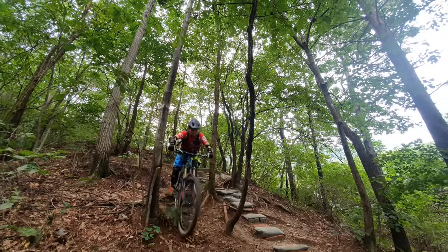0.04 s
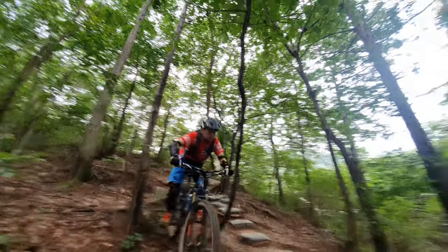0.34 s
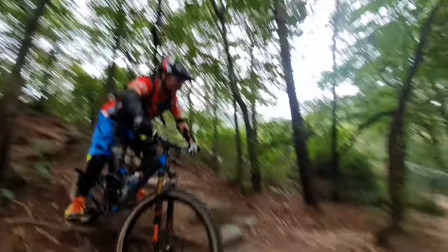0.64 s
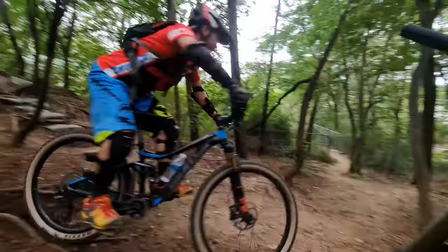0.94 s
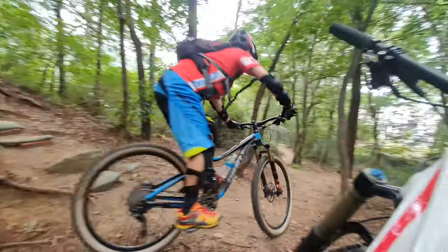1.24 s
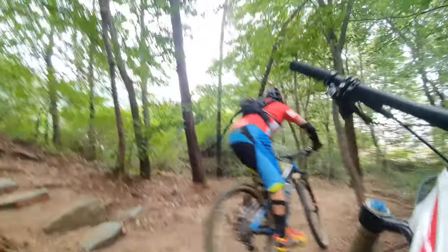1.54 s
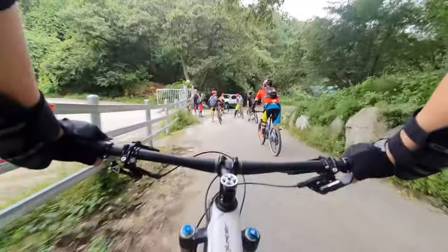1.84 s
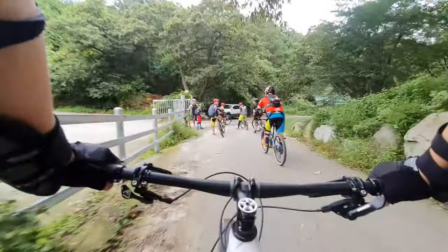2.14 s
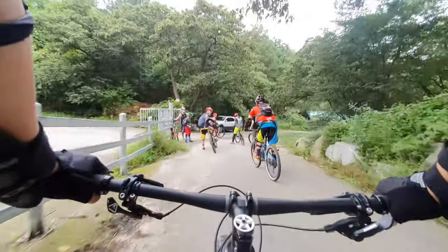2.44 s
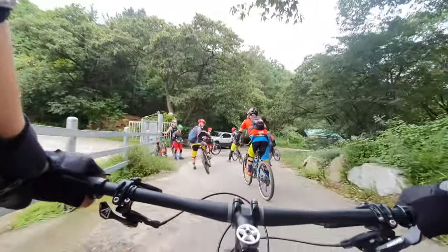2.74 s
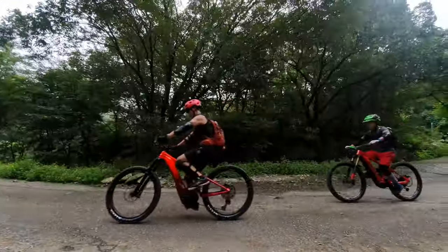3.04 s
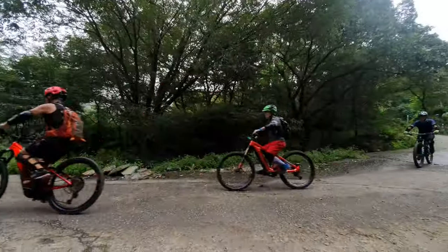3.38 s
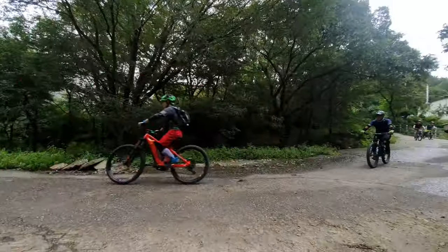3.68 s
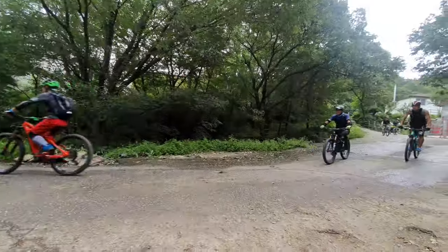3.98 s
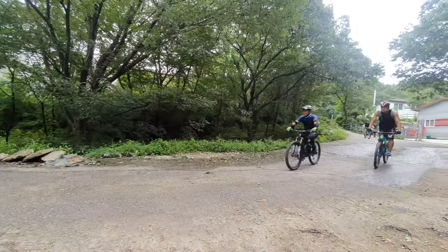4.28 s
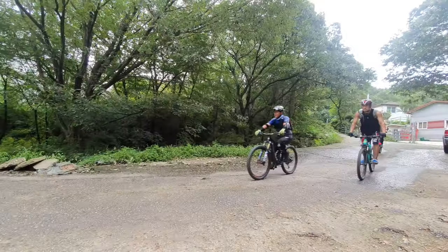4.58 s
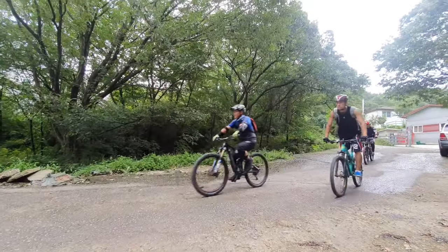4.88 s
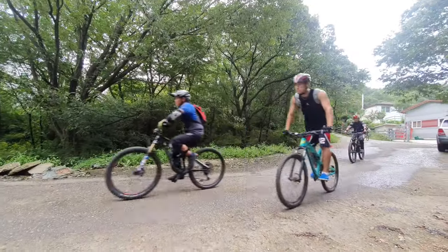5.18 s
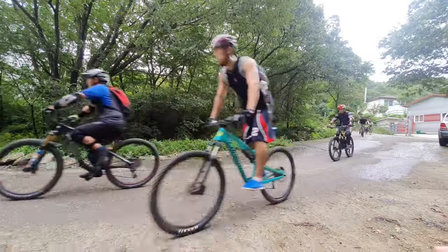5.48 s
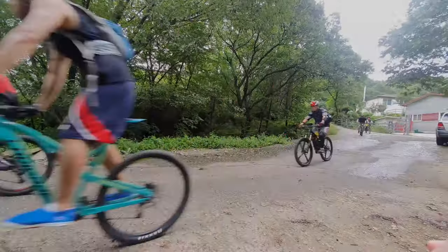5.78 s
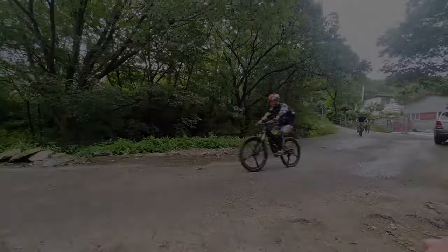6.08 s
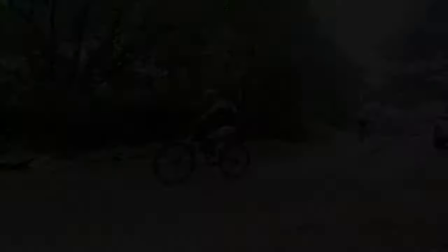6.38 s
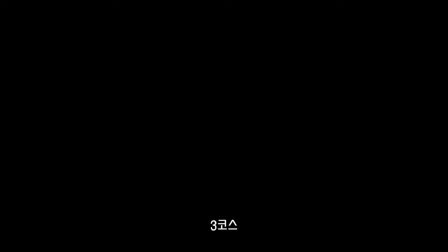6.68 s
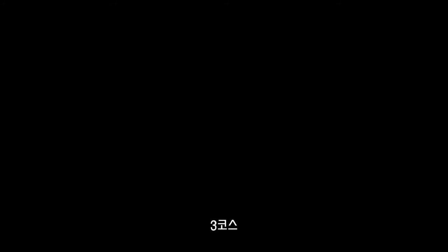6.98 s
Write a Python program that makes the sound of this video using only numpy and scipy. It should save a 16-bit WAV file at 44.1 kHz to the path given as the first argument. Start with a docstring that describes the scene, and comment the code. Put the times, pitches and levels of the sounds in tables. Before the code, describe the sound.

Knobbly tyres thud and crunch over dirt and roots in the woods, with metal clacks and gusts thumping the microphone. Next the microphone rides along on a bike: wind surges and drones around it while chain links tick and a brake disc squeaks thinly. Finally, from the roadside, several bicycles roll by one after another with pattering tyres, buzzing freehubs and a few sharp clicks, before a sudden cut to silence.

```python
"""A mountain bike thumps and crunches down a dirt trail: tyres crush grit and knock on roots, the
chain clacks. Cut to wind roaring round a rider's chest and hooting in a small camera's housing, over
ticking chain links and a squeaking brake disc. Cut to a group coasting past on rough asphalt: tyres
hum and patter, freehub pawls buzz on their ratchets, until the sound is cut off."""
import sys
import numpy as np
from scipy import signal
from scipy.fft import rfft, irfft
from scipy.io import wavfile
from scipy.ndimage import uniform_filter1d

SR = 44100
rng = np.random.default_rng(int(sys.argv[2]) if len(sys.argv) > 2 else 0)


def generate_wav(signal):
    """Clip the signal to [-1, 1] and save it as 16-bit WAV at the path in sys.argv[1]."""
    frames = np.transpose(np.atleast_2d(signal))
    scaled = np.clip(frames, -1, 1) * 32767
    pcm = np.round(scaled).astype(np.int16)
    wavfile.write(sys.argv[1], SR, pcm)


N = 309582
TRAIL_END_S, RIDE_START_S, RIDE_END_S, ROAD_END_S = 1.675, 1.702, 2.874, 6.435

# Layer spectra: freq_hz, density_db
WIND_SPECTRUM = [(13, -37), (22, -26.5), (45, -1.5), (65, 2.5), (86, 2.5), (135, -10), (170, -6),
                 (220, -35), (370, -120)]
RUMBLE_SPECTRUM = [(82, -17), (140, -17.5), (182, 1.5), (282, -3.5), (383, -1), (441, -4.5), (622, -3),
                   (696, -7.5), (863, -8.5), (1050, -20.5), (1300, -28), (1690, -50), (2860, -120)]
CRUNCH_SPECTRUM = [(680, -19), (1120, -10.5), (1250, -6), (1450, 5.5), (1650, 3.5), (2410, 2), (3120, -5),
                   (4040, -3), (5200, -19), (6760, -26), (11400, -120)]
SPRAY_SPECTRUM = [(2820, -30), (4800, 0.5), (7520, -3.5), (9010, -2), (9910, -5.5), (14300, -5),
                  (16000, -13)]
ROAR_SPECTRUM = [(82, -58.5), (140, -17.5), (167, -6.5), (211, -12), (274, -1), (409, 2), (551, -2),
                 (588, -3), (646, 1), (740, -7.5), (863, -13), (1000, -11), (1300, -25), (1690, -29),
                 (2860, -120)]
RUSH_SPECTRUM = [(680, -51), (1150, -3), (1990, 2.5), (2490, -8.5), (2600, -32), (3380, -46), (5720, -120)]
RIDE_HISS_SPECTRUM = [(1410, -20.5), (2400, -3.5), (2740, 3), (3360, -4.5), (4950, -2), (5610, -7),
                      (6450, -4.5), (7740, -13.5), (9500, -8.5), (11900, -14.5), (13800, -8.5)]
GRIT_SPECTRUM = [(700, -13.5), (1100, -3), (1750, -0.5), (2200, -2), (2700, -9), (4500, -30)]
HUM_SPECTRUM = [(76, -40), (130, 1), (140, -12), (210, 1.5), (241, 1.5), (303, -1.5), (491, -5),
                (601, -10.5), (901, -11.5), (1180, -24), (1300, -34), (1690, -44), (2860, -120)]
PATTER_SPECTRUM = [(680, -35.5), (1150, -18), (1280, -8.5), (1750, -2.5), (2350, 3), (3000, 2),
                   (3320, -2.5), (4120, -0.5), (5200, -5.5), (6760, -40), (11400, -120)]
ROAD_HISS_SPECTRUM = [(2820, -12), (4800, -4), (5670, -1.5), (6970, 0), (7670, -1.5), (9190, 1),
                      (10500, -1), (14000, 0), (15100, -7), (16000, 2.5)]
# Stereo width: freq_hz, side_minus_mid_db
TRAIL_WIDTH = [(60, -19), (150, -16.5), (380, -13), (950, -4.5), (2380, 0.5), (5980, 1), (15000, -1)]
RIDE_WIDTH = [(60, -2), (150, -9), (380, -16), (950, -6.5), (2380, -5), (5980, 1.5), (15000, 0.5)]
ROAD_WIDTH = [(60, -15), (130, -17), (290, -13), (640, -2), (1410, 1.5), (3100, 0), (6820, 0), (15000, 0)]

# Gusts on the microphone ports: start_s, length_s, level_db
GUSTS = [(0.02, 0.084, -15.5), (0.15, 0.16, -23.5), (0.38, 0.0998, -28), (0.515, 0.032, -24.5),
         (0.8, 0.16, -29.5), (1.96, 0.16, -27.5), (2.16, 0.059, -31), (2.44, 0.035, -24),
         (2.995, 0.18, -22), (3.19, 0.12, -31.5)]
# Closeness of the tyres on the trail: time_s, crunch_db, spray_db
DIRT_LEVELS = [(0.01, -31, -38), (0.078, -25.5, -36), (0.134, -28, -40.5), (0.308, -26.5, -35),
               (0.5, -28, -42.5), (0.574, -35, -44.5), (0.988, -26.5, -40), (1.08, -31, -40.5),
               (1.29, -29.5, -39), (1.44, -27, -42), (1.485, -33.5, -45.5), (1.6, -26, -40.5),
               (1.66, -32, -44.5)]
# Twigs and pebbles popping: pitch_hz
POP_HZ = (1770, 2400, 3100, 4000, 7470)
# Rough stretches of roots and stones: start_s, length_s, thud_db, thrown_grit_db
BUMPS = [(0.021, 0.019, -18, -48), (0.041, 0.11, -33, -34.5), (0.217, 0.016, -16.5, -32),
         (0.241, 0.061, -20, -34), (0.302, 0.026, -32, -25.5), (0.412, 0.049, -25.5, -35.5),
         (0.469, 0.027, -16.5, -51), (0.77, 0.17, -23, -39), (0.984, 0.025, -30, -31.5)]
# Shakes and air puffs on the camera: start_s, level_db, pitch_hz, t60_s, pan_db
JOLTS = [(0.024, 4.5, 82, 0.12, -1), (0.518, -15.5, 60, 0.22, 0), (3.082, 6, 160, 0.016, -20),
         (3.137, -0.5, 55.6, 0.033, -11), (3.592, -11, 72, 0.068, -17), (4.402, -12, 71.6, 0.068, -18)]
# Tyre and rim knocks, sharp wind buffets: start_s, level_db, pitch_hz, t60_s, crack_db, pan_db
KNOCKS_AND_BUFFETS = [(0.0438, -15, 2000, 0.027, -9, 1.5), (0.0744, -12.5, 1880, 0.054, -12, -0.5),
                      (0.087, -10.5, 660, 0.041, -31, 3), (0.1585, -23, 2390, 0.012, -29, 0),
                      (0.212, -4.5, 520, 0.019, -15, 1), (0.2253, 1, 480, 0.014, -11, -1),
                      (0.226, -16, 1560, 0.024, -24, 5), (0.2716, -18.5, 1840, 0.056, -28, 0),
                      (0.3448, -15, 1740, 0.063, -25, 1), (0.4865, -9.5, 1430, 0.033, -31, 7),
                      (0.486, -7.5, 820, 0.031, -31.5, -6), (0.486, -16.5, 2360, 0.018, -31.5, -5),
                      (0.9372, -7, 500, 0.014, -4.5, 5), (0.9897, -5, 620, 0.022, -32, 4),
                      (0.9914, -7, 1350, 0.017, -29.5, -4), (1.036, -24, 1750, 0.06, -32, 2),
                      (1.2524, -18.5, 2173, 0.041, -21, -6), (1.303, -20, 2370, 0.06, -38.5, 9),
                      (1.361, -18, 2030, 0.018, -28, 3), (1.424, -19, 1750, 0.14, -35, 3),
                      (1.588, -21.5, 2060, 0.18, -30, 6), (1.709, -25.5, 684, 0.1, -45, 1),
                      (2.514, -7.5, 640, 0.022, -39, -2.5), (1.971, -6, 640, 0.032, -36, 1),
                      (2.166, -14.5, 2300, 0.033, -40, 5), (2.1757, -10.5, 1950, 0.017, -40, -7),
                      (2.173, -12, 200, 0.034, -50, -3), (2.82, -20, 1790, 0.032, -38, 0),
                      (4.274, -27, 1440, 0.047, -28, 3), (5.309, -9.5, 2040, 0.0096, -24, 13),
                      (5.629, -13, 2500, 0.034, -14.5, 2), (5.696, -11, 2900, 0.02, -27, 3.5),
                      (5.83, -11, 2680, 0.034, -31, 3), (5.9452, -17.5, 2630, 0.036, -28, 5),
                      (6.139, -13.5, 2150, 0.03, -24, 3), (6.146, -13.5, 2400, 0.03, -8, 2),
                      (6.1698, -5.5, 2850, 0.013, -28, 7), (6.1699, -13.5, 2000, 0.026, -36, 2),
                      (6.2894, -8.5, 2450, 0.025, -31, 3.5), (6.2898, -16, 500, 0.029, -39, -2)]
# Chain and metal parts striking: start_s, level_db, bright_hz, relative_snap_db, pan_db
CLACKS = [(0.623, -15, 3120, -22, 0), (0.682, -7.5, 3650, -29, 2.5), (0.7078, 2.5, 3430, -17, 0),
          (0.817, -12.5, 6660, -20, 2), (1.089, -12, 3980, -24, 2), (1.655, -13, 3380, -13, -3),
          (2.321, -13, 3050, -28, 0), (2.648, -13, 2850, -28, 0), (2.727, -13, 2950, -28, 1.5),
          (2.297, -10.5, 2900, -26, 0), (2.675, -8.5, 2740, -28, 2), (2.534, -12, 3420, -16, 4.5),
          (2.8555, -12, 2900, -28, 1), (3.356, 2.5, 4700, -10.5, 1), (3.3752, -3.5, 3550, -17, 3),
          (3.443, -19, 6600, -18, 12), (3.7925, -9, 4300, -26, 4)]
# Modes of those parts: pitch_hz, level_db, t60_s
METAL_MODES = [(1245, 11.5, 0.076), (2930, -1, 0.012), (3160, -8, 0.028), (3700, -2, 0.014),
               (4470, -11, 0.011), (5160, -19, 0.02), (5050, -11.5, 0.02), (6820, -2.5, 0.025),
               (6510, -3.5, 0.031), (8721, -7.5, 0.022), (10130, -7, 0.022), (11700, -8, 0.021)]
# Tread hum on firm dirt: time_s, pitch_hz, level_db
TREAD_HUM = [(0.75, 389.3, -64), (1.0, 389.5, -30.5), (1.35, 379.3, -35), (1.66, 374.6, -43)]
# Tyres scrubbing through a turn: pitch_hz, width_hz, level_db, peak_s, half_length_s
SCRUB_RINGS = [(916, 240, -35.5, 1.12, 0.64), (1696, 120, -28, 1.29, 0.22), (2280, 110, -25, 1.34, 0.098),
               (3150, 460, -36.5, 1.38, 0.2), (3990, 310, -37, 1.48, 0.097)]
# Slow freehub on the trail: time_s, clicks_per_s, relative_peak_db
TRAIL_HUB = [(1.031, 20, 7.5), (1.28, 20, 9.5), (1.35, 13, 9), (1.66, 14.5, 11)]

# Air surges round the rider: peak_s, level_db
SURGES = [(1.79, -31), (1.828, -17.5), (1.905, -16.5), (2.045, -21), (2.115, -17), (2.17, -19),
          (2.245, -19), (2.32, -16.5), (2.385, -16), (2.45, -15.5), (2.525, -15.5), (2.588, -14.5),
          (2.675, -16), (2.75, -16.5), (2.835, -19)]
# Housing drone: time_s, pitch_hz
HOUSING_DRONE = [(1.72, 450), (1.9, 480), (2.04, 440), (2.3, 400), (2.48, 410), (2.67, 450), (2.76, 415),
                 (2.86, 400)]
# Grit patches under the tyres: peak_s, half_length_s, level_db
GRIT_PATCHES = [(1.8, 0.1, -34), (2.19, 0.05, -34), (2.36, 0.039, -33), (2.585, 0.03, -30.5),
                (2.671, 0.039, -27.5), (2.822, 0.015, -24)]
# Housing hoots: peak_s, level_db, pitch_hz, half_length_s, glide_hz_per_s
HOOTS = [(1.805, -19, 646, 0.033, -900), (1.912, -26.5, 1018, 0.041, 2000),
         (1.985, -15.5, 514, 0.017, -600), (2.112, -15, 439, 0.047, 800), (2.321, -13.5, 387, 0.018, 0),
         (2.385, -10.5, 410, 0.03, 0), (2.565, -16, 803, 0.011, 0), (2.672, -25.5, 800, 0.04, -1000),
         (2.705, -12.5, 483, 0.019, -900), (2.79, -1.5, 440, 0.013, 0.5)]
# Brake disc catching its pad: peak_s, level_db
DISC_CATCHES = [(2.114, -14), (2.669, -18)]
# Modes of a chain link: pitch_hz, width_hz, relative_db
LINK_MODES = [(2680, 240, -5), (3120, 240, -3)]

# Passing bikes: closest_s, half_length_s, level_drop_s, hum_db, patter_db, hiss_db, pan_db
PASSES = [(3.1, 0.31, 3.36, -28.5, -32, -28.5, 1), (4.5, 0.18, 6.16, -29, -39, -34, -0.5),
          (5.238, 0.32, 11.7, -26, -28.5, -21.5, 0.5), (5.683, 0.13, 7, -27, -28, -22, 3),
          (6.09, 0.26, 6.16, -23.5, -29, -24, 5), (6.397, 0.16, 7.2, -30.5, -33.5, -32.5, 3)]
# Side the breeze favours: time_s, pan_db
BREEZE_PAN = [(2.9, -13), (3.3, -13.5), (3.8, -5), (4.6, -2), (5.1, -0.5)]
# Coasting freehubs, one list each: time_s, clicks_per_s, relative_peak_db
ROAD_HUBS = [
    [(2.872, 57, 6), (3.17, 60, 7.5), (3.42, 57, 4), (3.7, 58.5, 4), (4.15, 33, -1)],
    [(3.2, 117, -2), (3.35, 116, 3), (3.7, 116, 2), (4.0, 94, -1), (4.45, 109, 1), (4.85, 103, 2),
     (5.05, 110, 4.5), (5.67, 111, 3), (6.43, 112, 0)],
    [(5.5, 50, -4), (5.8, 51.5, 3), (6.14, 48, 0)],
    [(5.95, 75, -4), (6.25, 72, 4), (6.43, 72.5, 6)],
]
# Rings of tread, hubs and discs, loose gravel: pitch_hz, width_hz, level_db, peak_s, half_length_s
TREAD_RINGS = [(791, 44, -39, 4.18, 0.55), (890, 70, -38, 4.33, 0.19)]
HUB_RINGS = [(2395, 160, -32, 5.15, 0.45), (2950, 350, -32, 5.4, 0.5), (4228, 24, -34.5, 4.88, 0.14),
             (4604, 34, -35, 4.35, 0.08), (4604, 24, -35.5, 4.83, 0.12), (5376, 24, -39, 5.0, 0.22),
             (6977, 120, -39, 4.8, 0.4), (8670, 220, -24, 5.12, 0.075), (8530, 190, -23.5, 5.4, 0.11),
             (8700, 350, -33, 4.75, 0.3), (9400, 260, -27, 5.29, 0.06), (9350, 160, -31, 5.25, 0.8)]
GRAVEL_RINGS = [(2240, 500, -28, 5.14, 0.25), (2600, 520, -29, 5.58, 0.17)]

TIME_S = np.arange(N) / SR


def from_db(db):
    """Decibels to gain."""
    return 10 ** (np.asarray(db) / 20)


def unit_rms(x):
    """Scale to unit power."""
    return x / np.sqrt(np.mean(x ** 2) + 1e-20)


def curves(rows):
    """Columns after time_s, interpolated at every sample."""
    times_s, *columns = np.transpose(rows)
    return [np.interp(TIME_S, times_s, column) for column in columns]


def during(start_s, end_s):
    """Gate with 2 ms fades."""
    return np.clip(np.minimum(TIME_S - start_s, end_s - TIME_S) / .002 + .5, 0, 1)


def swell(peak_s, half_length_s):
    """Gaussian rise and fall."""
    return np.exp(-np.minimum(((TIME_S - peak_s) / half_length_s) ** 2, 40))


def bursts(rows, attack_s, release_s):
    """Gain of events that rise, hold and decay, summed in power."""
    power = 0
    for start_s, length_s, level_db in rows:
        rise = np.clip((TIME_S - start_s) / attack_s + .5, 0, 1)
        fall = np.exp(-np.clip((TIME_S - start_s - length_s) / release_s, 0, 20))
        power += (from_db(level_db) * rise * fall) ** 2
    return np.sqrt(power)


def panned(pan_db):
    """Stereo gains; pan_db is left minus right."""
    return from_db(np.array([[.5], [-.5]]) * pan_db)


def add(out, start_s, sound):
    """Mix in a short sound."""
    i = max(round(start_s * SR), 0)
    out[:, i:i + sound.shape[-1]] += sound[..., :N - i]


def drift(rate_hz):
    """Slow random curve, unit RMS."""
    step, warmup = 40, 2000
    pole = np.exp(-2 * np.pi * rate_hz * step / SR)
    noise = rng.standard_normal(N // step + warmup + 2)
    slow = signal.lfilter([1], [1, -2 * pole, pole * pole], noise)[warmup:]
    return np.interp(np.arange(N) / step, np.arange(len(slow)), unit_rms(slow))


def flutter(depth_db, rate_hz):
    """Randomly wandering gain."""
    return from_db(depth_db * drift(rate_hz))


def eddies(depth_db, rate_hz):
    """Unsteady force: lumpy noise, unrelated left and right."""
    return rng.standard_normal((2, N)) * flutter(depth_db, rate_hz)


def grains(per_s, spread_db, bed):
    """Force of tiny uneven contacts over a smooth bed of smaller ones."""
    born = rng.random(N) < per_s / SR
    sizes = from_db(spread_db * np.minimum(rng.exponential(1, N), 2.5))
    return unit_rms(born * sizes * rng.standard_normal((2, N))) + bed * rng.standard_normal((2, N))


def coloured(x, spectrum, skirt_db_per_octave=0):
    """Minimum-phase filter; skirts fall for two octaves past the spectrum's ends."""
    hz, db = np.transpose(spectrum)
    octave = np.log2(np.abs(np.fft.fftfreq(8192, 1 / SR)) + 1)
    beyond = np.abs(octave - np.clip(octave, np.log2(hz[0]), np.log2(hz[-1])))
    shape_db = np.interp(octave, np.log2(hz), db) - skirt_db_per_octave * np.minimum(beyond, 2)
    log_response = np.conj(signal.hilbert(np.log(from_db(shape_db))))
    return signal.fftconvolve(x, np.fft.ifft(np.exp(log_response)).real)[:N]


def voiced(forces, spectrum, width):
    """Colour two forces as mid and side of one stereo sound."""
    mid, side = (unit_rms(coloured(force, spectrum, skirt_db_per_octave=36)) for force in forces)
    return mid + coloured(side, width) * [[1], [-1]]


def resonance(x, pitch_hz, width_hz):
    """Two-pole resonator, unit peak gain."""
    r = np.exp(-np.pi * width_hz / SR)
    poles = [1, -2 * r * np.cos(2 * np.pi * pitch_hz / SR), r * r]
    return signal.lfilter(np.array([1, 0, -1]) * (1 - r * r) / 2, poles, x + 1e-18)


def double_resonance(x, pitch_hz, width_hz):
    """Two equal resonators in series, unit RMS."""
    return unit_rms(resonance(resonance(x, pitch_hz, width_hz), pitch_hz, width_hz))


def noise_band(pitch_hz, width_hz, samples=N):
    """Stereo band of noise, unit RMS."""
    return unit_rms(resonance(rng.standard_normal((2, samples)), pitch_hz, width_hz))


def wavering(pitch_hz, width_hz):
    """Randomly driven resonance following a pitch curve."""
    phase = 2 * np.pi * np.cumsum(pitch_hz) / SR
    return drift(width_hz) * np.cos(phase) + drift(width_hz) * np.sin(phase)


def passing_rings(rows, force):
    """Resonances that swell and fade as a bike goes by."""
    return sum(from_db(level_db) * swell(peak_s, half_s) * unit_rms(resonance(force, pitch_hz, width_hz))
               for pitch_hz, width_hz, level_db, peak_s, half_s in rows)


def gusts(breeze_db):
    """Wind gain: gusts over a steady breeze."""
    return np.hypot(from_db(breeze_db), bursts(GUSTS, attack_s=.012, release_s=.03))


def pops(per_s=140):
    """Twigs and pebbles crackle at random, low pitches strongest."""
    births = rng.random((len(POP_HZ), N)) < per_s / len(POP_HZ) / SR
    return unit_rms(sum(resonance(born * rng.uniform(-1, 1, (2, N)), hz, hz / 4) / hz ** .8
                        for born, hz in zip(births, POP_HZ)))


def trail(slope_end_s=.67, settle_db_per_s=8.5):
    """Knobbly tyres thud and hum on earth, crush dirt in clumps and fling grit; bumps swell them."""
    crunch_db, spray_db = curves(DIRT_LEVELS)
    tread_hz, tread_db = curves(TREAD_HUM)
    bumps = np.array(BUMPS)
    thud = bursts(bumps[:, [0, 1, 2]], attack_s=.0052, release_s=.0099)
    thrown = bursts(bumps[:, [0, 1, 3]], attack_s=.0052, release_s=.0099)
    clumps = flutter(.86, rate_hz=25)
    wind = gusts(breeze_db=-37) * voiced(eddies(2.5, rate_hz=1.5), WIND_SPECTRUM, TRAIL_WIDTH)

    settled_db = settle_db_per_s * np.maximum(TIME_S - slope_end_s, 0)  # quieter on level ground
    rumble = voiced(grains(per_s=1200, spread_db=2, bed=1.6), RUMBLE_SPECTRUM, TRAIL_WIDTH)
    rumble *= np.hypot(from_db(crunch_db + .5 - settled_db), thud)
    tread = from_db(tread_db) * wavering(tread_hz, width_hz=23) * during(TREAD_HUM[0][0], TRAIL_END_S)

    crunch = voiced(grains(per_s=1100, spread_db=2.5, bed=1.3), CRUNCH_SPECTRUM, TRAIL_WIDTH)
    crunch += from_db(-7.5) * pops()
    crunch *= np.hypot(from_db(crunch_db - 1), from_db(-8) * thrown + from_db(-18) * thud)
    spray = voiced(grains(per_s=900, spread_db=3.5, bed=1.7), SPRAY_SPECTRUM, TRAIL_WIDTH)
    spray *= np.hypot(from_db(spray_db + 4), thrown)

    ticks = from_db(spray_db) * np.sqrt(freehub(TRAIL_HUB)) * noise_band(14000, width_hz=4000)
    scrub_force = grains(per_s=500, spread_db=2.5, bed=.7) * flutter(2.2, rate_hz=50)
    dirt = clumps * (crunch + passing_rings(SCRUB_RINGS, scrub_force) + spray)
    return (wind + rumble + tread + (dirt + ticks) * panned(2.1)) * during(-1, TRAIL_END_S)


def jolts(rise_s=.0073):
    """A shake or puff of air swings out as a deep thump."""
    out, t = np.zeros((2, N)), np.arange(SR // 2) / SR
    for start_s, level_db, pitch_hz, t60_s, pan_db in JOLTS:
        envelope = from_db(level_db - 60 * t / t60_s) * (1 - np.exp(-t / rise_s))
        add(out, start_s, panned(pan_db) * envelope * np.sin(2 * np.pi * pitch_hz * t))
    return out


def knocks_and_buffets():
    """Tyres and rims knock, wind buffets the camera: damped swings, nearby resonances, a crack."""
    out, t = np.zeros((2, N)), np.arange(SR // 10) / SR
    for start_s, level_db, pitch_hz, t60_s, crack_db, pan_db in KNOCKS_AND_BUFFETS:
        force, crack = rng.standard_normal((2, 2, len(t)))
        fade = from_db(-60 * t / t60_s)
        swing = fade * np.sin(2 * np.pi * pitch_hz * t)  # faded again below: dies twice as fast
        scatter = .55 * double_resonance(force, pitch_hz, width_hz=.55 * pitch_hz)
        sound = from_db(level_db) * (swing + scatter) + from_db(crack_db - 3) * crack
        add(out, start_s, panned(pan_db) * fade * sound)
    return out


def clacks(rattle_t60_s=.015, snap_t60_s=.014, contact_s=.0004):
    """Metal parts strike, rattle and snap; modes near bright_hz are driven hardest."""
    out, t = np.zeros((2, N)), np.arange(SR // 5) / SR
    contact = np.minimum(t / contact_s, 1)
    for start_s, level_db, bright_hz, snap_db, pan_db in CLACKS:
        rattle = .38 * from_db(-60 * t / rattle_t60_s) * noise_band(bright_hz, bright_hz / 6, len(t))
        snap = from_db(snap_db - 60 * t / snap_t60_s) * noise_band(9700, 3700, len(t))
        clack = rattle + snap
        for pitch_hz, mode_db, t60_s in METAL_MODES:
            phase = rng.uniform(0, 2 * np.pi) + rng.normal(0, .34, (2, 1))
            struck_db = mode_db - 5 - 22 * abs(np.log2(pitch_hz / bright_hz))
            clack += from_db(struck_db - 60 * t / t60_s) * np.sin(2 * np.pi * pitch_hz * t + phase)
        add(out, start_s, from_db(level_db) * panned(pan_db) * contact * clack)
    return out


def freehub(rows, click_s=.0018, uneven_db=.9):
    """Power envelope of pawls dropping into the ratchet at wheel speed."""
    clicks_per_s, peak_db = curves(rows)
    start_s, end_s = rows[0][0], rows[-1][0]
    teeth = np.cumsum(clicks_per_s * (TIME_S > start_s)) / SR
    strength_db = uneven_db * rng.standard_normal(2000)[teeth.astype(int)]
    age = (teeth % 1) / clicks_per_s / click_s
    return (from_db(peak_db + strength_db) * age * np.exp(1 - age)) ** 2 * during(start_s, end_s)


def speeding(start_db, db_per_s):
    """Gain rising as the ride gathers speed."""
    return from_db(start_db + db_per_s * (np.clip(TIME_S, RIDE_START_S, RIDE_END_S) - RIDE_START_S))


def ride():
    """Air surges over the moving camera and drones in its housing; tyres hiss below."""
    surge = np.sqrt(sum((from_db(level_db) * swell(peak_s, .029)) ** 2 for peak_s, level_db in SURGES))
    airflow = np.hypot(speeding(-24, db_per_s=5.3), surge)
    buffet = gusts(breeze_db=-35) * voiced(eddies(3, rate_hz=16), WIND_SPECTRUM, RIDE_WIDTH)
    roar = airflow * voiced(eddies(2, rate_hz=36), ROAR_SPECTRUM, RIDE_WIDTH)
    drone_hz, = curves(HOUSING_DRONE)
    drone = airflow * speeding(-12.5, db_per_s=6.3) * wavering(drone_hz, width_hz=30)
    hiss = speeding(-38, db_per_s=6.4) * voiced(eddies(1.5, rate_hz=35), RIDE_HISS_SPECTRUM, RIDE_WIDTH)
    rush = voiced(eddies(1.5, rate_hz=22), RUSH_SPECTRUM, RIDE_WIDTH)
    rush *= np.hypot(speeding(-35.5, db_per_s=2), from_db(-19) * surge)
    layers = buffet + roar + drone + rush + hiss + grit_patches() + hoots()
    return layers * during(RIDE_START_S, RIDE_END_S)


def grit_patches():
    """Tyres crunch over patches of grit."""
    gain = sum(from_db(level_db) * swell(peak_s, half_s) for peak_s, half_s, level_db in GRIT_PATCHES)
    return gain * voiced(grains(per_s=700, spread_db=3, bed=.8), GRIT_SPECTRUM, RIDE_WIDTH)


def hoots():
    """Gusts blow short tones, some gliding, in the camera housing."""
    out = np.zeros(N)
    for peak_s, level_db, pitch_hz, half_s, glide_hz_per_s in HOOTS:
        t = TIME_S - peak_s
        phase = 2 * np.pi * (pitch_hz + glide_hz_per_s * t / 2) * t
        out += from_db(level_db) * swell(peak_s, half_s) * np.sin(phase)
    return out


def disc_squeaks(start_s=2.037, every_s=.0695, graze_db=-35, pitch_hz=15170):
    """A brake disc grazes its pad and at times catches, swelling one high, scratchy ring."""
    times_s = np.arange(start_s, RIDE_END_S, every_s)
    grazes = [(time_s + .004 * late, graze_db + 3 * hard)
              for time_s, (late, hard) in zip(times_s, rng.standard_normal((len(times_s), 2)))]
    touch = sum(from_db(level_db) * swell(peak_s, .0105) for peak_s, level_db in grazes + DISC_CATCHES)
    ring = resonance(noise_band(pitch_hz, width_hz=200), pitch_hz, width_hz=400)
    return touch * unit_rms(ring * flutter(3, rate_hz=150))


def chain(start_s=2.114, links_per_s=39.15, slack_links=.03, impact_t60_s=.015, uneven_db=2.2):
    """Links drop onto the sprocket slightly early or late; loose rollers rattle in between."""
    links = np.maximum((TIME_S - start_s) * links_per_s + slack_links * drift(rate_hz=20), 0)
    age_s = (links % 1) / links_per_s
    rattle = 0
    for pitch_hz, width_hz, level_db in LINK_MODES:
        strength_db = uneven_db * rng.standard_normal(1000)[links.astype(int)]
        envelope = from_db(strength_db - 60 * age_s / impact_t60_s) + .1  # floor: the rollers
        force = envelope * (rng.standard_normal(N) + .7 * rng.standard_normal((2, N)))
        rattle += from_db(level_db) * double_resonance(force, pitch_hz, width_hz)
    return speeding(-30.5, db_per_s=.5) * unit_rms(rattle) * during(start_s, RIDE_END_S)


def passing_bikes(hum_reach=1.41, fade_s=.029):
    """Hum, patter and hiss gains: power falls with distance squared; hum carries furthest."""
    hum, patter, hiss = from_db([-43.5, -40, -38.5]) ** 2  # bikes further off
    for closest_s, half_s, level_drop_s, hum_db, patter_db, hiss_db, pan_db in PASSES:
        along = (TIME_S - closest_s) / half_s
        gate = np.clip((level_drop_s - TIME_S) / fade_s + .5, 0, 1)  # the sound drops abruptly
        near = gate / (1 + along ** 2) * panned(pan_db) ** 2
        hum += from_db(hum_db) ** 2 * gate / (1 + (along / hum_reach) ** 2)
        patter += from_db(patter_db) ** 2 * near
        hiss += from_db(hiss_db) ** 2 * near
    return np.sqrt(hum), np.sqrt(patter), np.sqrt(hiss)


def ratcheting(clicks):
    """Gain that gathers steady noise into clicks at the same mean power."""
    return np.sqrt((1 + clicks) / uniform_filter1d(1 + clicks, size=4000))


def flickering(x, depth_db, rate_hz, bands=22):
    """Each band swells and fades independently."""
    centres_hz = np.geomspace(1500, 15000, bands)
    bins_hz, spectrum = np.fft.rfftfreq(N, 1 / SR), rfft(x)
    parts = (irfft(spectrum * np.interp(bins_hz, centres_hz, band), N) for band in np.eye(bands))
    return sum(unit_rms(flutter(depth_db, rate_hz)) * part for part in parts)


def road(draught_db=-7):
    """Passing bikes stir the air; tyres hum and patter on asphalt while freehubs buzz."""
    hum_gain, patter_gain, hiss_gain = passing_bikes()
    clicks = sum(freehub(rows) for rows in ROAD_HUBS)
    breeze_pan_db, = curves(BREEZE_PAN)
    air = np.hypot(gusts(breeze_db=-38.5), from_db(draught_db) * hum_gain)
    wind = air * panned(breeze_pan_db) * voiced(eddies(1.5, rate_hz=20), WIND_SPECTRUM, ROAD_WIDTH)

    hum = hum_gain * voiced(grains(per_s=2500, spread_db=4, bed=1.4), HUM_SPECTRUM, ROAD_WIDTH)
    patter = patter_gain * voiced(grains(per_s=2000, spread_db=3, bed=1.4), PATTER_SPECTRUM, ROAD_WIDTH)
    hiss = hiss_gain * voiced(grains(per_s=3600, spread_db=10.5, bed=3.6), ROAD_HISS_SPECTRUM, ROAD_WIDTH)

    # Pawls rule the treble and share the midrange with the tyres.
    coarse_ground = flutter(.76, rate_hz=7.6)
    buzz = hiss * ratcheting(clicks) + patter * ratcheting(clicks / 2) * coarse_ground
    buzz = flickering(buzz, depth_db=2.2, rate_hz=22) * flutter(.6, rate_hz=12)

    hub_rings = passing_rings(HUB_RINGS, ratcheting(clicks) * eddies(.5, rate_hz=7.1))
    tread_song = passing_rings(TREAD_RINGS, eddies(0, rate_hz=16))
    distant_rush = from_db(-43.5) * noise_band(1546, width_hz=290)
    gravel_force = resonance(grains(per_s=600, spread_db=3, bed=.8), 2500, width_hz=1500)
    gravel = passing_rings(GRAVEL_RINGS, gravel_force)
    layers = wind + hum + buzz + gravel + hub_rings + tread_song + distant_rush
    return layers * during(RIDE_END_S, ROAD_END_S)


def scene():
    """Trail, ride and road in turn, with their jolts, knocks, buffets and clacks."""
    return trail() + ride() + chain() + disc_squeaks() + road() + jolts() + knocks_and_buffets() + clacks()


def record(dry, cutoff_hz=15800):
    """Hard limit at full scale, then a steep low-pass."""
    lowpass = signal.ellip(12, .1, 90, cutoff_hz, fs=SR, output="sos")
    return signal.sosfilt(lowpass, np.clip(dry, -1, 1))


dry = scene()
out = record(dry)
generate_wav(out)
```